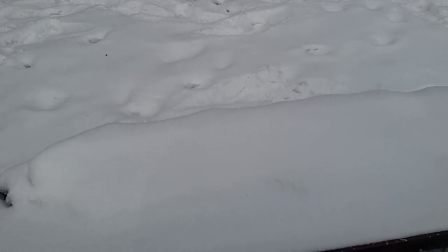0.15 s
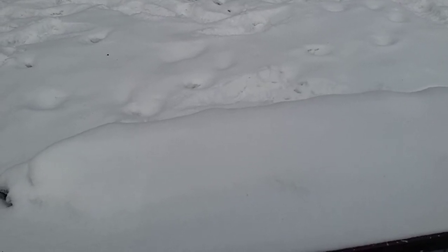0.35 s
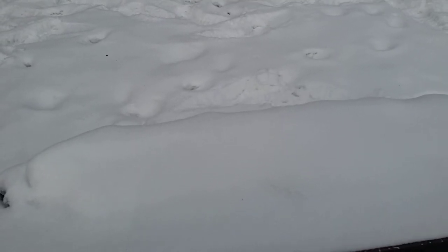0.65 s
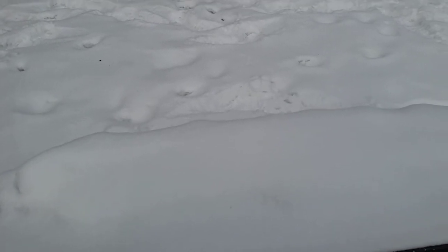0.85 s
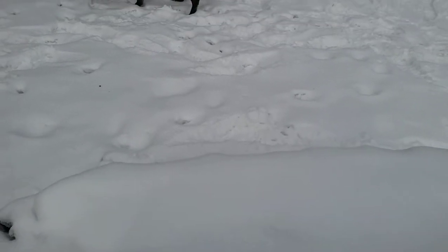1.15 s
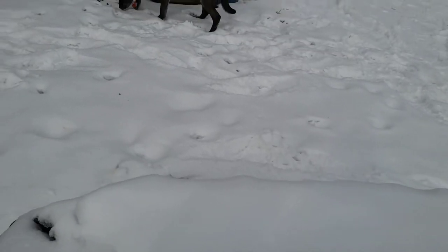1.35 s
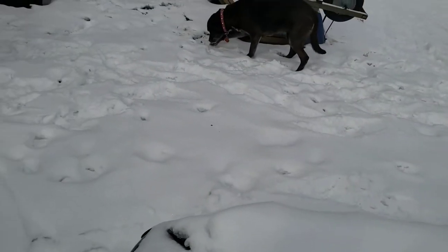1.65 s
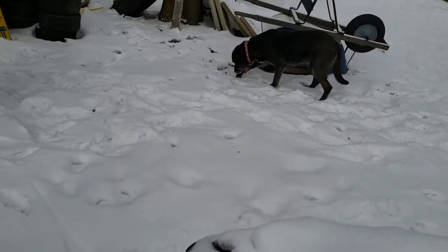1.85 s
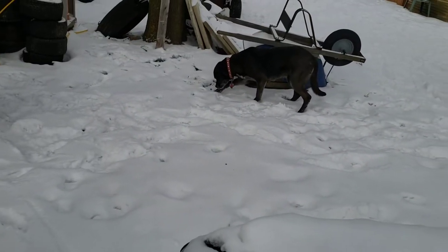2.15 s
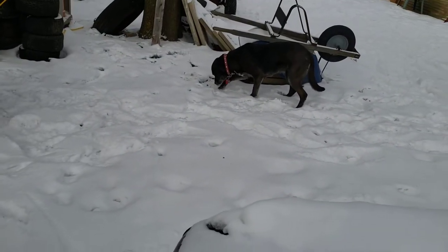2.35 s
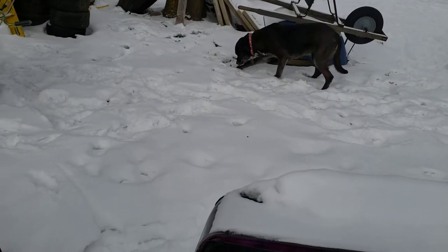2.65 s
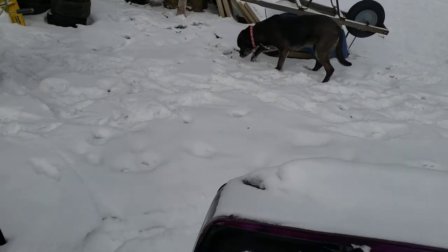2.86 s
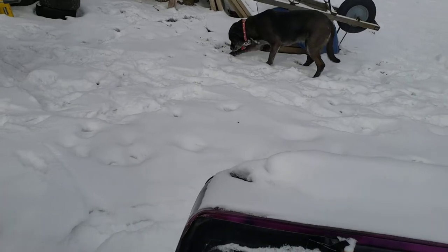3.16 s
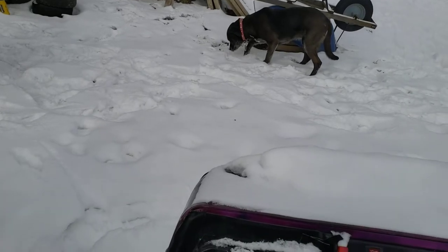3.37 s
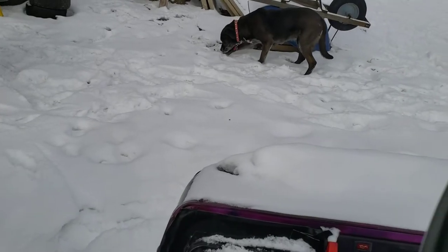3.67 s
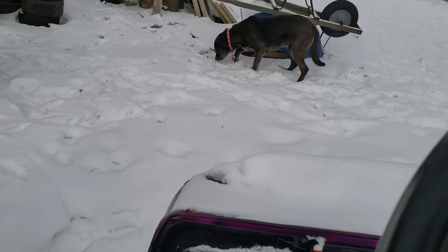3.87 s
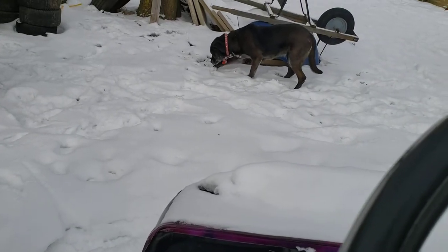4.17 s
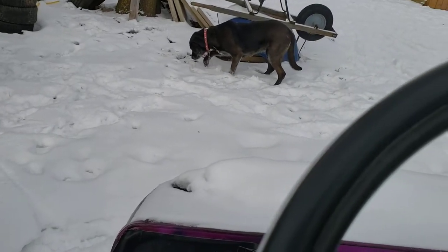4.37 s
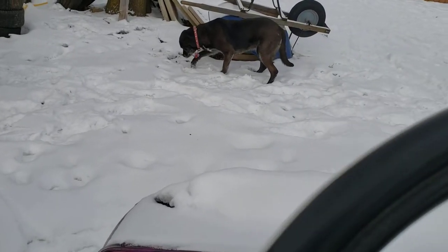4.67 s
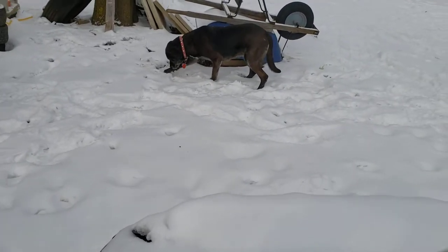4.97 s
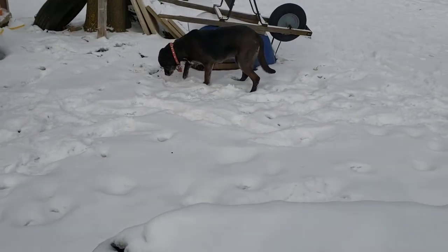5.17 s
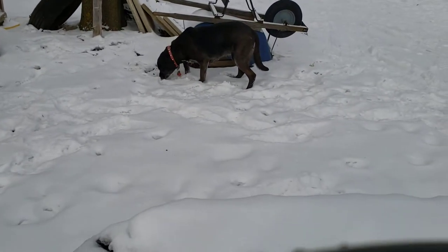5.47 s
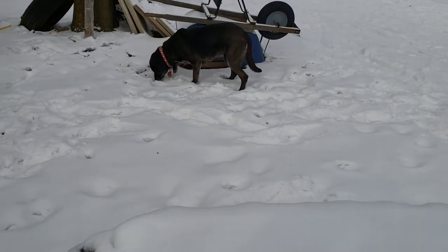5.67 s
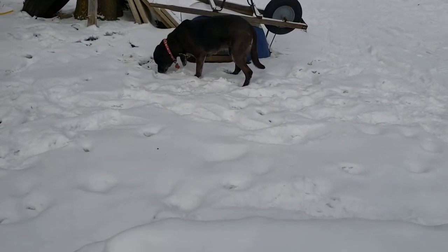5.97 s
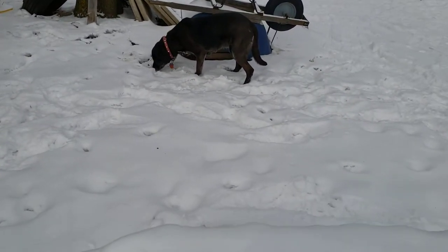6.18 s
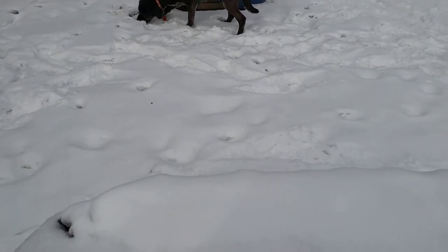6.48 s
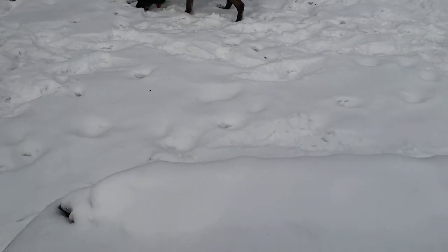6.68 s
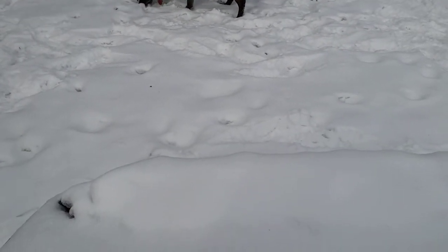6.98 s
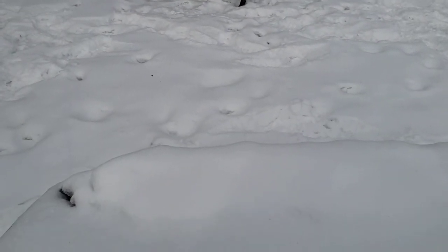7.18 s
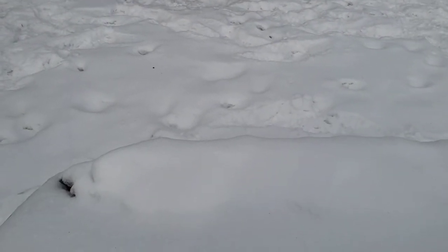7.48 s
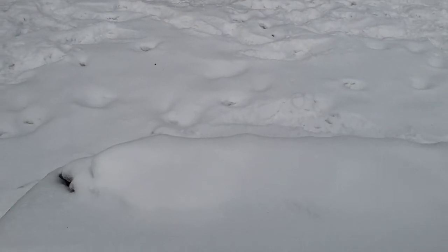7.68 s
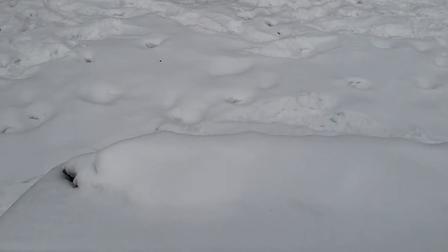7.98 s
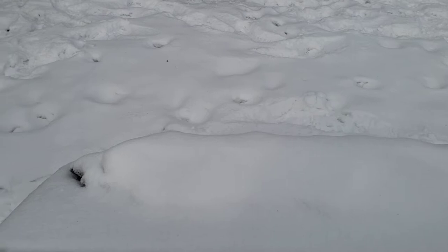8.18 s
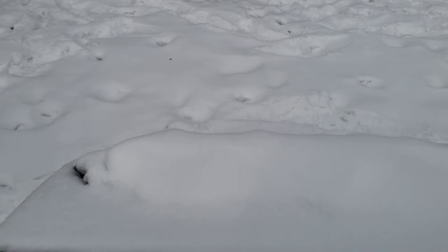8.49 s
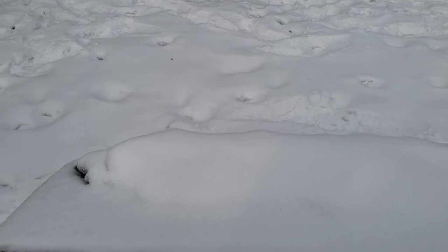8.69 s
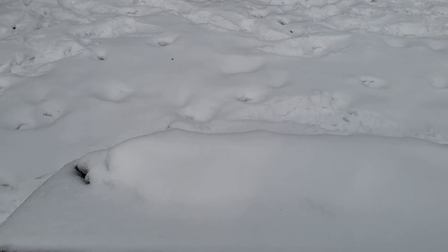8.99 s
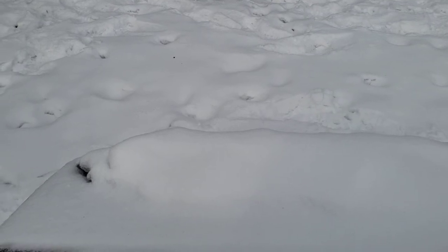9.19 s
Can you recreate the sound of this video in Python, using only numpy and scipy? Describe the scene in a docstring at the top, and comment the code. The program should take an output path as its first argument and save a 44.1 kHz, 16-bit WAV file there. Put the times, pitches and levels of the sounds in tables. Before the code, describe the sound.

A golf cart's single-cylinder gas engine idles, speeds up with whining gears and coasts, while a hand rubs and creaks on the microphone.

```python
"""Golf cart on snow

A single-cylinder engine idles, pulls the cart with whining gears, coasts and catches again.
Its gas pulses boom in the muffler and body; its mechanism clatters once a cycle.
The rider's hand rubs, creaks and bumps on a plastic camera case, close to its two microphones."""
import sys
import numpy as np
from scipy import signal
from scipy.fft import rfft, irfft, next_fast_len
from scipy.io import wavfile
from scipy.ndimage import uniform_filter1d, map_coordinates

SR = 44100
rng = np.random.default_rng(int(sys.argv[2]) if len(sys.argv) > 2 else 0)


def to_wav(s):
    """Save 16-bit WAV."""
    ch = np.atleast_2d(s).T  # columns
    pcm = np.round(np.clip(ch, -1, 1) * 32767)  # PCM
    wavfile.write(sys.argv[1], SR, pcm.astype(np.int16))


N = 411894

# engine speed: t/s, four-stroke cycle rate/Hz
CYCLE_RATE = [(0.0, 6.3), (1.2, 6.19), (2.0, 9.09), (2.8, 9.93), (3.5, 10.08), (3.9, 7.57), (4.3, 8.46),
              (4.7, 10.05), (5.2, 10.31), (6.2, 11.1), (6.9, 11.06), (7.2, 9.35), (7.6, 6.66), (8.1, 4.89),
              (8.8, 7.18), (9.34, 7.81)]
# accelerator: t/s, travel/0-1
PEDAL_TRAVEL = [(6.88, 0.93), (6.98, 0), (8.228, 0.04), (8.24, 0.52)]
# exhaust envelope: t/s, relative level/dB
BOOM_ENVELOPE = [(0.0, -27), (0.23, -28), (0.26, -53), (0.28, -32), (0.8, -27), (0.83, -41), (0.93, -36.5),
                 (0.96, -29), (1.25, -41.5), (1.3, -27), (1.61, -32), (1.66, -24), (1.71, -36.5),
                 (1.98, -24.5), (2.08, -33), (2.26, -27), (3.35, -29.5), (3.51, -22.5), (3.67, -33.5),
                 (4.06, -23.5), (4.14, -32), (4.21, -27.5), (6.58, -30), (6.71, -25), (6.76, -34.5),
                 (6.89, -24.5), (7.08, -42), (7.18, -23), (7.52, -51), (7.6, -35), (7.62, -47.5),
                 (8.09, -38), (8.19, -57.5), (8.3, -27), (8.56, -32), (8.69, -21.5), (8.79, -36.5),
                 (8.84, -27), (9.29, -31), (9.34, -27)]
# gas pulses: phase/cycles, relative level/dB
GAS_PULSES = [(0.39, 1.5), (0.651, 0), (0.856, 0.5)]
# muffler and body modes: f/Hz, width/Hz, driven gain/dB, idle gain/dB
MUFFLER_MODES = [(43.7, 2.3, -17.5, -17.5), (57.5, 4.1, -2, -10.5), (84.87, 4.44, 1, 2.5)]
# valve and piston taps: phase/cycles, relative level/dB
VALVE_TAPS = [(0.03, -5), (0.161, 3), (0.35, 1), (0.88, -4)]
# clatter against speed: cycle rate/Hz, gain/dB
CLATTER_GAIN = [(5, -48), (6.5, -45), (8, -41), (10, -39), (11, -39)]
# mechanism spectrum: f/Hz, relative level/dB
CLATTER_SPECTRUM = [(70, -29.5), (115, 6), (160, 0.5), (240, -3.5), (330, -10), (520, -11), (650, -19),
                    (1100, -23), (1600, -25), (2100, -33), (3200, -46.5), (8000, -79.5)]
# covers and panels: f/Hz, nominal width/Hz, driven gain/dB, idle gain/dB
PANEL_MODES = [(211.5, 24, -13.5, -22.5), (320, 112, -20, -14), (468.6, 30, -20, -46),
               (866, 24, -27, -28.5), (986, 96, -26, -36.5), (1218, 25, -30, -24.5),
               (1408, 17, -31.5, -30.5), (1577, 43, -30.5, -39.5)]
# restless grip: t/s, rustle/dB, hiss/dB
GRIP_LEVELS = [(0.3, -66.5, -72), (0.6, -55, -62.5), (1.6, -65.5, -68.5), (2.1, -61, -69),
               (3.2, -59.5, -66.5), (3.7, -67.5, -73.5), (4.1, -60, -68.5), (4.45, -91, -75.5),
               (5.1, -67.5, -71.5), (5.8, -59.5, -66.5), (6.2, -63.5, -69.5), (6.45, -60, -58.5),
               (6.6, -57, -58), (7.3, -51.5, -61.5), (7.85, -62.5, -72.5), (8.12, -77, -78.5),
               (9.3, -78.5, -81)]
# shifts of hold: t/s, length/s, rustle/dB, hiss/dB, hiss left-right/dB
HAND_SLIDES = [(0.696, 0.474, -47.5, -56.5, -11), (1.143, 0.3, -46.5, -55.5, -9.5),
               (1.499, 0.049, -45, -62.5, -18), (1.71, 0.11, -51, -57.5, -9.5),
               (1.853, 0.074, -50.5, -53.5, -8.5), (2.19, 0.3, -52.5, -56, -4),
               (3.198, 0.24, -59.5, -67.5, -8), (3.815, 0.14, -51.5, -55, -3),
               (4.597, 0.17, -58, -63, -8.5), (5.295, 0.027, -53.5, -52, -1.5),
               (5.402, 0.12, -50, -59, -13.5), (6.626, 0.13, -44, -48, 0.5), (6.743, 0.25, -47.5, -52, 1.5),
               (6.899, 0.21, -39.5, -42.5, 1.5), (6.976, 0.125, -38, -42.5, -5.5),
               (7.103, 0.31, -56, -53.5, 3), (7.468, 0.23, -57, -58.5, -3.5),
               (7.865, 0.11, -56, -67, -10.5)]
# hand rustle: f/Hz, relative level/dB
RUSTLE_SPECTRUM = [(150, -45), (400, 4), (900, 3.5), (1550, -8.5), (2000, -3), (3000, -4), (4000, -11),
                   (6500, -22.5), (9000, -43.5)]
# friction hiss: f/Hz, relative level/dB
HISS_SPECTRUM = [(2000, -23.5), (3500, -6.5), (5000, 2), (6700, 1), (7600, -4.5), (9300, 4), (10300, 3.5),
                 (10900, -0.5), (11900, 7.5), (13000, 4.5), (14800, -1.5), (15800, -2), (16300, -25.5)]
# hand pressing on the ports: t/s, rumble level/dB
PORT_PRESS = [(6.4, -83), (6.6, -63), (6.67, -36), (6.76, -41), (6.91, -42), (6.955, -28.5), (7.03, -27),
              (7.12, -30), (7.18, -40.5), (7.3, -54), (7.7, -48), (8.05, -120)]
# pressing rumble: f/Hz, relative level/dB
RUMBLE_SPECTRUM = [(30, -39), (55, 1.5), (85, -5.5), (140, 2.5), (270, -2.5), (380, -9), (700, -15),
                   (1200, -13.5), (2200, -21.5), (4000, -63.5)]
# plastic case modes: f/Hz, gain/dB, t60/s
CASE_MODES = [(873, -6, 0.019), (1150, -5.5, 0.024), (1402, -2.5, 0.019), (1610, -17.5, 0.041)]
# outdoor air: f/Hz, relative level/dB
AIR_SPECTRUM = [(30, 1), (300, 10.5), (1500, 3.5), (3000, -51.5), (7500, -45.5), (12000, -15),
                (16000, -26.5)]
# run of ticks: t/s, ring gain/dB
RATCHET_TICKS = [(0.028, -30), (0.051, -39.5), (0.081, -39), (0.111, -42.5), (0.128, -47.5), (0.143, -38),
                 (0.158, -41), (0.174, -45.5), (0.194, -39)]
# ticking part's modes: f/Hz, gain/dB, t60/s
PART_MODES = [(1110, -12.5, 0.024), (1173, -3.5, 0.025), (1390, -13.5, 0.044), (1705, -10.5, 0.032),
              (2070, -17.5, 0.028), (2460, -14.5, 0.025), (4600, -21.5, 0.021), (5610, -20.5, 0.021)]
# grip slips: t/s, ring gain/dB, snap gain/dB, ring centre f/Hz
GRIP_SLIPS = [(0.412, -34, -41, 1570), (0.507, -18.5, -22.5, 1380), (0.538, -29, -40.5, 1250),
              (0.551, -29, -42.5, 1250), (0.56, -24, -40.5, 1330), (0.699, -22.5, -38, 2140),
              (0.865, -30.5, -36.5, 2700), (0.903, -48, -34.5, 1020), (0.996, -42, -31, 1630),
              (1.026, -38, -30, 1400), (1.05, -33, -46, 1970), (1.057, -39, -44, 1250),
              (1.085, -32, -45, 1910), (1.091, -34, -47, 1690), (1.111, -32, -39.5, 1450),
              (1.098, -26.5, -34, 1020), (1.126, -27, -31, 1470), (1.162, -51, -36, 960),
              (1.223, -21, -30, 1460), (1.239, -33, -44, 1470), (1.25, -27, -46.5, 1370),
              (1.348, -43, -34, 1000), (1.362, -22.5, -35.5, 1150), (1.374, -13.5, -16, 1277),
              (1.38, -23.5, -26.5, 1430), (1.422, -23.5, -25.5, 1450), (1.448, -22.5, -38, 1410),
              (1.503, -35, -42, 990), (1.543, -23, -22.5, 1520), (1.575, -31, -49, 1190),
              (1.674, -33.5, -37.5, 1470), (1.883, -29, -54, 880), (2.949, -36.5, -40.5, 1300),
              (3.901, -29.5, -47, 974), (3.921, -33, -33.5, 1840), (4.222, -31, -32, 1880),
              (7.227, -27.5, -45, 900)]
# case seam clicks: t/s, snap gain/dB, tick gain/dB
SEAM_CLICKS = [(0.452, -34.5, -59), (0.498, -30, -32.5), (0.698, -14, -23.5), (0.757, -38, -55),
               (0.925, -34, -38), (1.363, -39, -27), (1.726, -30, -31), (2.33, -50, -37.5),
               (2.498, -56, -40.5), (2.588, -40, -43.5), (2.79, -33, -42.5), (2.8, -35, -40),
               (2.989, -42, -42), (3.007, -46, -48.5), (3.038, -40, -47.5), (3.372, -38, -44.5),
               (3.811, -38.5, -42), (4.006, -41, -39.5), (4.049, -32, -38.5), (4.221, -43, -37),
               (4.973, -46, -49), (5.222, -60, -53), (5.24, -58, -45.5), (5.305, -30.5, -35),
               (5.798, -44, -46), (5.997, -37.5, -51), (6.872, -34, -43), (7.225, -53, -45),
               (7.337, -42, -37.5), (7.389, -29, -26), (7.649, -36, -43), (7.73, -33.5, -49.5),
               (7.785, -52, -46), (7.888, -46, -43), (7.914, -34, -42.5), (7.932, -43, -41.5),
               (7.952, -41, -44.5), (7.994, -36.5, -57), (8.116, -53, -48.5)]
# knocks on the case: t/s, level/dB, f/Hz
CASE_BUMPS = [(0.795, -25, 189), (0.812, -30.5, 273), (1.725, -17.5, 144), (1.88, -35.5, 827),
              (3.852, -30, 418), (7.227, -20.5, 204), (7.41, -35, 440), (7.651, -29.5, 388),
              (7.953, -34.5, 330)]
# drive gears: t/s, f/Hz, tone level/dB, overtone level/dB
GEAR_WHINE = [(1.9, 465, -82, -90), (2.3, 475.5, -58, -78), (2.9, 480.3, -51.5, -72),
              (3.5, 481, -52.5, -76), (3.75, 468, -68, -85), (4.3, 456.6, -76, -71.5),
              (4.73, 466.6, -68, -60), (5.2, 479, -66, -64.5), (5.6, 486, -63, -63), (6.0, 484, -55.5, -77),
              (6.7, 487, -58, -76), (7.2, 464, -76, -90), (7.85, 439, -66, -90), (8.03, 437, -56, -84),
              (8.12, 430, -90, -94)]
# fingertip strokes: t/s, length/s, start level/dB, end level/dB, f/Hz, nominal width/f, left-right/dB
FINGER_STROKES = [(2.322, 0.18, -58.5, -62.5, 5100, 0.2, 1), (2.86, 0.055, -63, -64, 5000, 0.46, -3),
                  (3.142, 0.14, -76, -72, 4300, .3, -11), (4.79, 0.15, -72, -79, 5155, .08, -8.5),
                  (5.3, 0.046, -46, -52, 2780, 0.46, 11.5), (5.342, 0.15, -56, -55.5, 2820, 0.36, 11),
                  (5.393, 0.099, -70, -74, 5200, 0.33, 0), (5.51, 0.07, -71, -58.5, 3100, 0.56, 5),
                  (5.668, 0.2, -72, -73, 3300, 0.21, -10.5), (5.7, .2, -71, -72, 5200, .2, -5),
                  (6.309, 0.35, -64.5, -52, 2242, 0.47, -5.5)]
# left-right likeness: f/Hz, coherence/0-1
COHERENCE = [(100, 0.94), (250, 0.95), (500, 0.61), (1200, 0.16), (3000, 0), (12000, 0)]
# microphone port balance: f/Hz, left-right/dB
PORT_BALANCE = [(100, 0), (300, .3), (700, .7), (1290, 5), (2380, 1), (4400, -2), (8100, -.5)]

CATCH_S = 8.236  # engine fires again after coasting
TIME_S = np.arange(N) / SR


def amp(db):
    """Decibels to gain."""
    return 10 ** (np.asarray(db) / 20)


def unit(x):
    """x at rms 1."""
    return x / np.sqrt(np.mean(x ** 2) + 1e-20)


def along(points, hz):
    """(f/Hz, value) points read on a log axis."""
    f, v = np.transpose(points)
    return np.interp(np.log(hz + 1), np.log(f + 1), v)


def curves(rows):
    """Per-sample curve of each column after t/s."""
    s, *cols = np.transpose(rows)
    return [np.interp(TIME_S, s, c) for c in cols]


def wobble(rate_hz):
    """Smooth random curve, knots at rate_hz."""
    knots = rng.standard_normal(int(N * rate_hz / SR) + 4)
    return map_coordinates(knots, [TIME_S * rate_hz], order=2)


def filtered(x, response):
    """x through a complex frequency response."""
    m = next_fast_len(N + SR // 2, real=True)
    return irfft(rfft(x, m) * response(np.fft.rfftfreq(m, 1 / SR)), m)[..., :N]


def bandpass(x, order, band_hz):
    """Causal flat band-pass."""
    return signal.sosfilt(signal.butter(order, band_hz, "bandpass", fs=SR, output="sos"), x)


def resonance(f, hz, width_hz):
    """Causal resonance, gain 1 at centre."""
    return 1j * f * width_hz / (hz * hz - f * f + 1j * f * width_hz)


def white(n=N):
    """Two independent noises."""
    return rng.standard_normal((2, n))


def spread(pair, response):
    """Filter an independent pair into stereo, bass coherent; rms 1."""
    angle = lambda f: np.arccos(np.clip(along(COHERENCE, f), -1, 1)) / 2
    mid, side = filtered(pair, lambda f: response(f) * np.array([np.cos(angle(f)), np.sin(angle(f))]))
    return unit(np.array([mid + side, mid - side]))


def coloured(pair, spectrum):
    """Stereo shaped by a (f/Hz, level/dB) spectrum; rms 1."""
    return spread(pair, lambda f: amp(along(spectrum, f)))


def panned(side_db):
    """Channel gains for a left-right difference."""
    return amp(np.vstack([side_db, -side_db]) / 2)


def gate(start_s, length_s, attack_s, release_s):
    """Linear rise, hold, exponential release."""
    age_s = TIME_S - start_s
    return np.clip(age_s / attack_s, 0, 1) * np.exp(-np.clip((age_s - length_s) / release_s, 0, 20))


def add(track, start_s, sound):
    """Mix a short sound into a track."""
    part = track[..., max(round(start_s * SR), 0):][..., :sound.shape[-1]]
    part += sound[..., :part.shape[-1]]


def pulses(cycle, pattern, jitter_s, scatter_db):
    """Impulses at set crank angles, scattered in time and size; rms 1."""
    track = np.zeros(N)
    cycles = np.arange(int(cycle[-1]) + 1)
    for phase, db in pattern:
        timing, size = rng.standard_normal((len(cycles), 2)).T
        due_s = np.interp(cycles + phase, cycle, TIME_S, right=N)
        at = ((due_s + jitter_s * timing) * SR).astype(int)
        inside = (at >= 0) & (at < N)
        track[at[inside]] += amp(db + scatter_db * size[inside])
    return unit(track)


def by_load(load, idle, driven):
    """Linear blend from idle (load 0) to driven (load 1)."""
    return idle + load * (driven - idle)


def exhaust(cycle, load, band_hz=(29, 107), evenness=0.9, gain_db=1.5):
    """Gas pulses ring the muffler: ragged at idle, an even chug under load."""
    flow = pulses(cycle, GAS_PULSES, jitter_s=0.00028, scatter_db=2.4)
    flow += by_load(load, 0.7, 0.18) * rng.standard_normal(N)
    body = np.zeros(N)
    for k, (hz, width_hz, driven_db, idle_db) in enumerate(MUFFLER_MODES):
        mode = filtered(flow, lambda f: resonance(f, hz, width_hz))
        body += (-1) ** k * amp(by_load(load, idle_db, driven_db)) * mode
    boom = bandpass(body, 4, band_hz)
    power = uniform_filter1d(uniform_filter1d(boom ** 2, size=SR // 10), size=SR // 20)
    levelled = unit(boom / (np.abs(power) + 1e-3 * np.mean(power)) ** (evenness / 2))
    return levelled * amp(curves(BOOM_ENVELOPE)[0] + gain_db)


def rattle(cycle, t60_s=0.067):
    """Each valve or piston tap excites its own dense ring, alike every cycle; rms 1."""
    t = np.arange(SR // 12) / SR
    track = np.zeros((2, N))
    for tap in VALVE_TAPS:
        hits = pulses(cycle, [tap], jitter_s=0.00008, scatter_db=2.24)
        ring = amp(-60 * t / t60_s) * white(len(t))
        track += signal.oaconvolve(hits[None], ring, axes=1)[:, :N]
    return unit(track)


def clatter(cycle, load, fade_cycles=0.78, grain_db=1.44, treble_hz=1900, idle_treble_db=-6):
    """Each firing shakes mechanism and panels; taps and treble grow with load."""
    throb_db = by_load(load, 13, 9.5) * np.exp(-(cycle % 1) / fade_cycles)
    shake = unit(amp(throb_db + grain_db * wobble(150)))
    tap_gain = by_load(load, 0.5, 0.91)
    blows = (white() * shake + tap_gain * rattle(cycle)) / np.hypot(1, tap_gain)
    sound = amp(by_load(load, -1.33, 0.67)) * coloured(blows, CLATTER_SPECTRUM)
    for hz, width_hz, driven_db, idle_db in PANEL_MODES:
        panel = spread(blows, lambda f: resonance(f, hz, 1.36 * width_hz) ** 2)
        sound += amp(by_load(load, idle_db, driven_db)) * panel
    dull = filtered(sound, lambda f: 1 / (1 + (f / treble_hz) ** 10))
    return dull + amp(idle_treble_db * (1 - load)) * (sound - dull)


def engine(coast_db=-6.5, catch_db=4.5, catch_fade_s=0.092):
    """One crank times all parts; pedal up unloads it, and the catch hits harder."""
    rate_hz, = curves(CYCLE_RATE)
    pedal, = curves(PEDAL_TRAVEL)
    cycle = np.cumsum(rate_hz) / SR
    load = np.clip(pedal * (rate_hz - 7) / 1.7, 0, 1)
    clatter_db = np.interp(rate_hz, *np.transpose(CLATTER_GAIN)) + coast_db * (1 - pedal)
    since_s = TIME_S - CATCH_S
    accent = amp(catch_db * (since_s > 0) * np.exp(-np.abs(since_s) / catch_fade_s))
    caught = np.clip(since_s / 0.005, 0, 1)
    firing = amp(clatter_db) * clatter(cycle, load) + caught * putts(cycle, rate_hz)
    return exhaust(cycle, load) + accent * firing + gears(cycle)


def hand(grip_side_db=-12.5, rise_share=0.23, uneven_db=1.17):
    """Rustle and hiss gains: a grip over the right port, plus brief slides."""
    rustle_db, hiss_db = curves(GRIP_LEVELS)
    rustle_power = amp(rustle_db) ** 2
    hiss_power = (amp(hiss_db) * panned(grip_side_db)) ** 2
    for s, length_s, rustle_db, hiss_db, side_db in HAND_SLIDES:
        shape = gate(s, length_s, attack_s=rise_share * length_s, release_s=0.052)
        rustle_power += (amp(rustle_db) * shape) ** 2
        hiss_power += (amp(hiss_db) * panned(side_db) * shape) ** 2
    uneven = amp(uneven_db * wobble(24))
    return uneven * np.sqrt(rustle_power), uneven * np.sqrt(hiss_power)


def friction(rate_hz, grain_db, smooth, fade_s):
    """Tiny, uneven, fast-fading slips over smooth sliding noise."""
    slips = (rng.random(N) < rate_hz / SR) * amp(grain_db * np.minimum(rng.exponential(size=N), 3))
    bursts = signal.lfilter([1], [1, -np.exp(-1 / (fade_s * SR))], slips)
    return white() * (unit(bursts) + smooth)


def rubbing(crackle_db=-3, stray_db=-10):
    """Hand friction rustles, hisses and rings the case; pressing on the ports rumbles."""
    rustle_gain, hiss_gain = hand()
    rustle = coloured(friction(rate_hz=240, grain_db=6.5, smooth=1, fade_s=0.0031), RUSTLE_SPECTRUM)
    case = lambda f: sum(amp(db) * resonance(f, hz, 8 / t60_s) ** 2 for hz, db, t60_s in CASE_MODES)
    crackle = spread(friction(rate_hz=140, grain_db=1.5, smooth=0.61, fade_s=0.00044), case)
    hiss = coloured(friction(rate_hz=110, grain_db=4, smooth=1.4, fade_s=0.0066), HISS_SPECTRUM)
    stray_ticks = coloured(friction(rate_hz=16, grain_db=2.5, smooth=0, fade_s=0.002), HISS_SPECTRUM)
    rumble = amp(curves(PORT_PRESS)[0] + 1.1 * wobble(45)) * coloured(white(), RUMBLE_SPECTRUM)
    return (rustle_gain * (rustle + amp(crackle_db) * crackle)
            + hiss_gain * (hiss + amp(stray_db) * stray_ticks) + rumble)


def air(level_db=-60):
    """Faint, steady outdoor noise."""
    return amp(level_db) * coloured(white(), AIR_SPECTRUM)


def ratchet(tick_db=-9, tick_t60_s=0.017, side_db=2):
    """A small hard part ticks repeatedly with the same ring."""
    t = np.arange(SR // 16) / SR
    ring = sum(amp(db - 60 * t / t60_s) * np.sin(2 * np.pi * hz * t + rng.normal(0, 0.56, (2, 1)))
               for hz, db, t60_s in PART_MODES)
    track = np.zeros((2, N))
    for s, db in RATCHET_TICKS:
        tick = amp(tick_db - 60 * t / tick_t60_s) * white(len(t))
        add(track, s, amp(db) * (ring + tick))
    return panned(side_db) * track


def creaks(case_hz=1322, snap_t60_s=0.018, tick_t60_s=0.011, creak_tick_db=-12.5, click_ring_db=-13.5):
    """Slips ring, snap and tick the case: grip creaks mostly ring, seam clicks mostly snap."""
    slips = [(s, ring_db, snap_db, snap_db + creak_tick_db, hz) for s, ring_db, snap_db, hz in GRIP_SLIPS]
    slips += [(s, db + click_ring_db, db, tick_db, case_hz) for s, db, tick_db in SEAM_CLICKS]
    t = np.arange(SR // 12) / SR
    attack = 1 - np.exp(-t / 0.0005)
    rings, snaps, ticks = np.zeros((3, 2, N))
    for s, ring_db, snap_db, tick_db, centre_hz in slips:
        for hz, mode_db, t60_s in CASE_MODES:
            port_gains = amp(rng.normal(0, 2.2, (2, 1)))
            tuned_hz = hz * centre_hz / case_hz * rng.normal(1, 0.025)  # grip retunes the mode
            mode = port_gains * np.sin(2 * np.pi * tuned_hz * t + rng.normal(0, 0.8, (2, 1)))
            add(rings, s, amp(ring_db + mode_db - 60 * t / t60_s) * mode * attack)
        add(snaps, s, amp(snap_db - 60 * t / snap_t60_s) * white(len(t)))
        add(ticks, s, amp(tick_db - 60 * t / tick_t60_s) * white(len(t)))
    snap_colour = lambda f: (3.9 * resonance(f, 1710, 300) + resonance(f, 2410, 356)
                             + 0.76 * resonance(f, 2900, 300) + 0.5 * resonance(f, 4250, 1100))
    snaps = bandpass(filtered(snaps, snap_colour), 3, band_hz=(1500, 5000))
    ticks = filtered(ticks, lambda f: amp(along(HISS_SPECTRUM, f)) * f / np.hypot(f, 6000))
    return panned(side_db=3) * rings + snaps + panned(side_db=-8) * ticks


def bumps(t60_s=0.054, roughness=0.44):
    """Soft bumps on the case give dull, damped knocks."""
    t = np.arange(SR // 6) / SR
    attack = 1 - np.exp(-t / 0.00032)
    track = np.zeros(N)
    for s, db, hz in CASE_BUMPS:
        thud = unit(bandpass(rng.standard_normal(len(t)), 2, band_hz=(hz / 2, hz * 2)))
        knock = np.sin(2 * np.pi * hz * t) + roughness * thud
        add(track, s, amp(db - 60 * t / t60_s) * attack * knock)
    return track


def gears(cycle, jerk_rad=0.86, waver_rad=0.3, uneven_db=2):
    """Drive gears whine with one overtone; each firing jerks their phase."""
    hz, tone_db, overtone_db = curves(GEAR_WHINE)
    phase = 2 * np.pi * np.cumsum(hz) / SR + jerk_rad * np.sin(2 * np.pi * cycle) + waver_rad * wobble(30)
    tone = amp(tone_db + uneven_db * wobble(15)) * np.sin(phase)
    overtone = amp(overtone_db + uneven_db * wobble(16)) * np.sin(2 * phase)
    return np.sqrt(2) * (tone + overtone)


def scrapes(skirt_db=-26, uneven_db=1.5):
    """A sliding fingertip hisses around one pitch per stroke."""
    track = np.zeros((2, N))
    for s, length_s, start_db, end_db, hz, width, side_db in FINGER_STROKES:
        gain = amp(np.interp(TIME_S, [s, s + length_s], [start_db, end_db]) + uneven_db * wobble(40))
        shape = gate(s, length_s, attack_s=0.0068, release_s=0.02)
        focus = lambda f: resonance(f, hz, width * hz) ** 2 + amp(skirt_db) * resonance(f, hz, hz) ** 2
        hiss = unit(filtered(rng.standard_normal((2, N), dtype=np.float32), focus))
        track += gain * shape * panned(side_db) * hiss
    return track


def putts(cycle, rate_hz, level_db=-44.5, attack_s=0.003, t60_s=0.18):
    """Each firing gives a short hollow bark."""
    age_s = (cycle % 1) / rate_hz
    shape = (1 - np.exp(-age_s / attack_s)) * amp(-60 * age_s / t60_s)
    return amp(level_db) * shape * spread(white(), lambda f: resonance(f, hz=346, width_hz=220) ** 2)


def scene():
    """Engine, handling and air; snow returns no echo."""
    return engine() + rubbing() + scrapes() + creaks() + ratchet() + bumps() + air()


def record(dry, top_hz=16100, fade_s=0.006):
    """Brief end fade, microphone port colouring and band limit."""
    fade = np.clip(TIME_S[::-1] / fade_s, 0, 1)
    return filtered(dry * fade, lambda f: panned(along(PORT_BALANCE, f)) * (f < top_hz))


dry = scene()
out = record(dry)
to_wav(out)
```